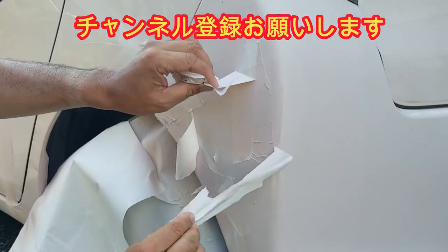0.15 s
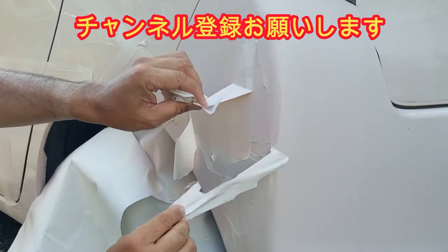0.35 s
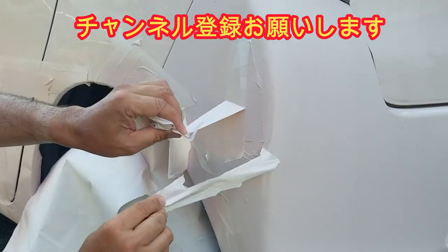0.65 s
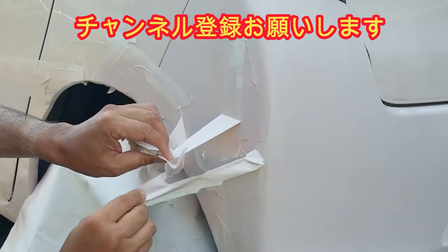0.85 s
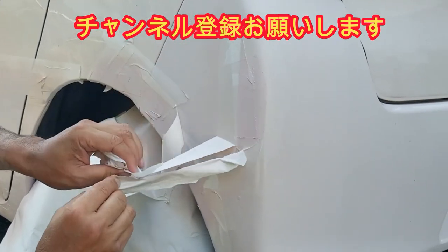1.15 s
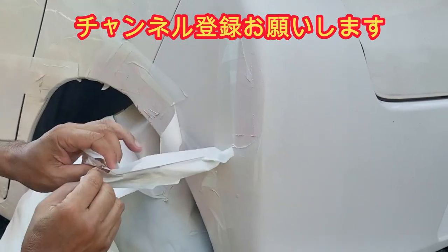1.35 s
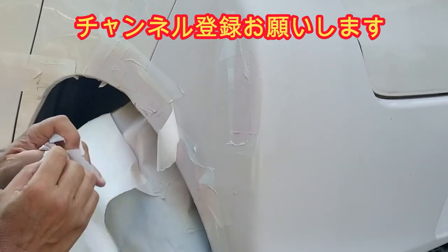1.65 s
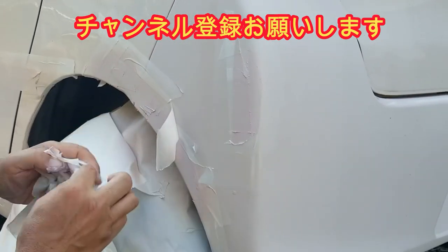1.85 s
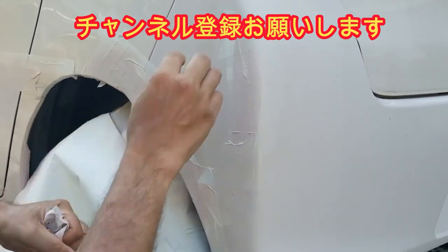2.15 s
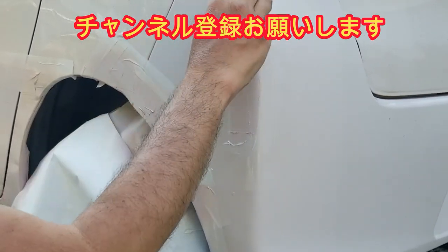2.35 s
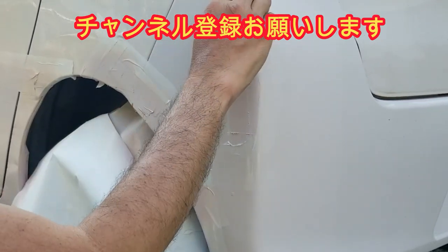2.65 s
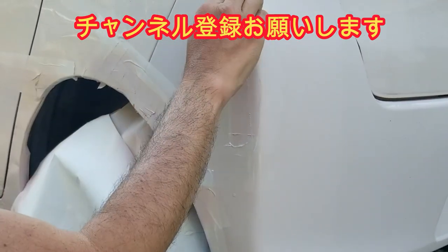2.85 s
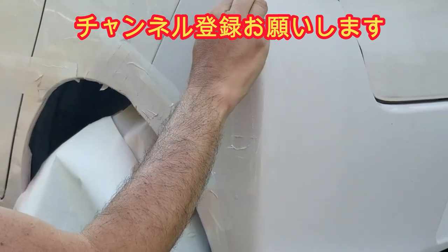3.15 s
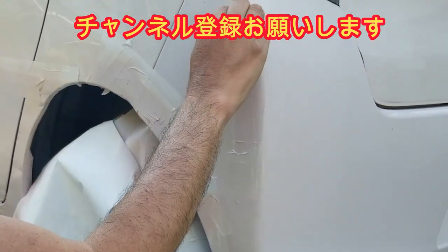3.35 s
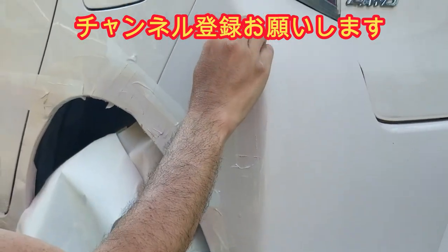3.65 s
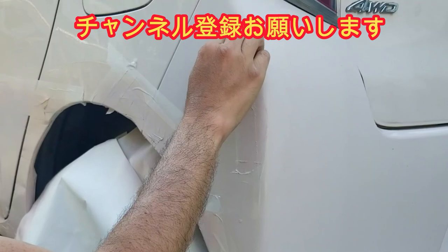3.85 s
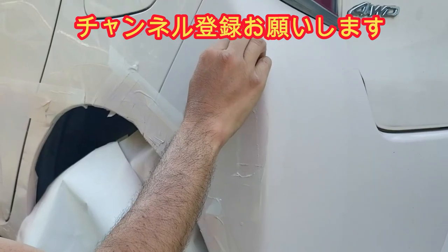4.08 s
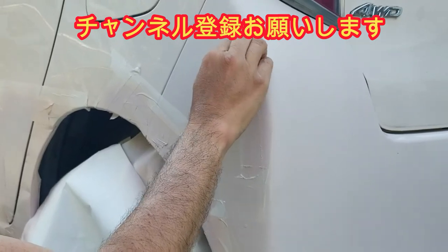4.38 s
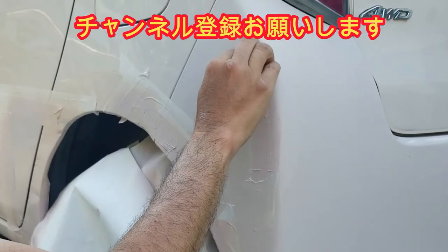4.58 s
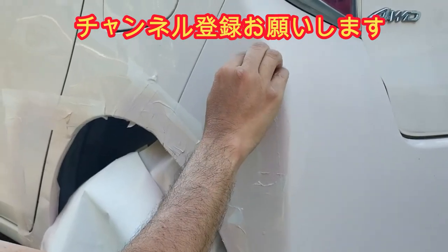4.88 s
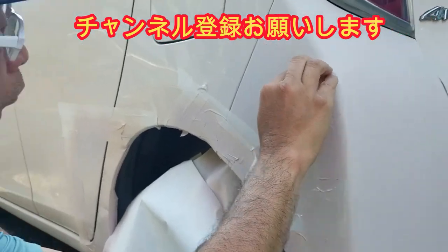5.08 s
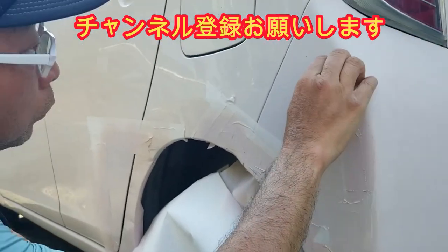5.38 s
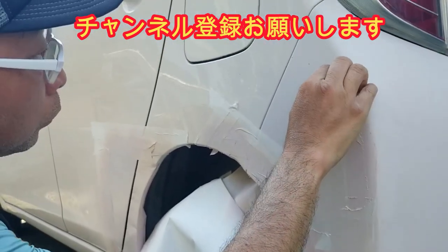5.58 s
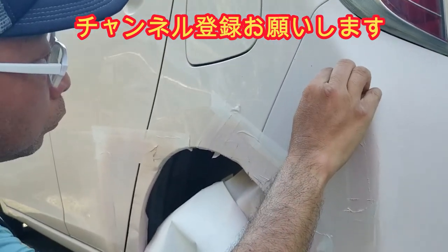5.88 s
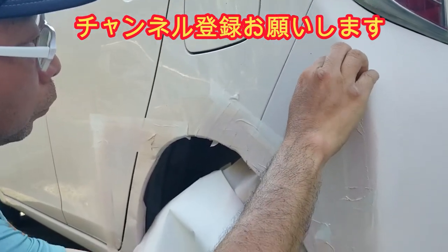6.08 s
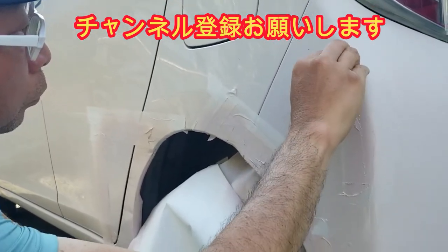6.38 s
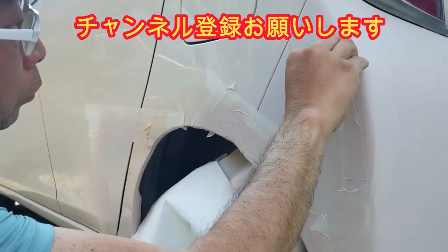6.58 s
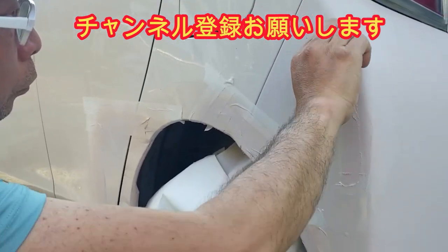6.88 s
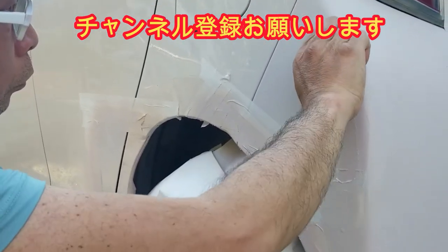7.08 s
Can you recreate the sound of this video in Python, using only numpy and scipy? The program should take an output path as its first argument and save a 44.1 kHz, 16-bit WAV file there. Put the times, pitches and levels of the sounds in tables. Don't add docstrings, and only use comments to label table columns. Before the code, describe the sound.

Close outdoor sound of tape tearing from hollow metal, paper creases snapping in the hands, then sparse nail knocks amid shrill insects and faint traffic.

```python
import sys
import numpy as np
from scipy import signal
from scipy.fft import rfft, irfft
from scipy.io import wavfile

SR = 44100
rng = np.random.default_rng(int(sys.argv[2]) if len(sys.argv) > 2 else 0)


def boost_factor(decibels):
    exponent = np.asarray(decibels, float) / 20
    return 10 ** exponent


def output_pcm(signal):
    pcm = np.clip(np.atleast_2d(signal).T, -1, 1) * 32767
    wavfile.write(sys.argv[1], SR, np.round(pcm).astype(np.int16))


N = 318843


def rms_one(x):
    return x / np.sqrt(np.mean(x ** 2, axis=-1, keepdims=True) + 1e-20)


def peak_one(x):
    return x / abs(x).max()


def filtered(x, order, hz, kind):
    return signal.sosfilt(signal.butter(order, hz, kind, fs=SR, output="sos"), x)


def in_time(rows, off_db=-120):
    s, *columns = np.transpose(rows)
    return [np.interp(np.arange(N) / SR, s, c, off_db, off_db) for c in columns]


def at_hz(points, hz):
    table = np.array(points)
    return np.interp(np.log(hz + 1e-3), np.log(table[:, 0]), table[:, 1])


def colour(x, points, extra_db=0):
    hz = np.arange(N // 2 + 1) * SR / N
    inside = (hz > points[0][0]) & (hz < points[-1][0])
    return irfft(rfft(x) * boost_factor(at_hz(points, hz) + extra_db) * inside, N)


def drift(rate):
    r = np.exp(-80 * np.pi * rate / SR)
    slow = signal.lfilter([1], [1, -2 * r, r * r], rng.standard_normal(N // 40 + 2002))[2000:]
    return np.interp(np.arange(N) / 40, np.arange(len(slow)), rms_one(slow))


def ring(clicks, hz, t60):
    r, w = boost_factor(-60 / (t60 * SR)), 2 * np.pi * hz / SR
    return signal.lfilter([0, np.sin(w)], [1, -2 * r * np.cos(w), r * r], clicks + 1e-18)


def grains(per_s, spread_db):
    sizes = boost_factor(spread_db * np.minimum(rng.exponential(1, N), 5)) * rng.choice([-1, 1], N)
    return sizes * (rng.random(N) < per_s / SR)


def swells(s, db, rise, fall):
    power, reach = np.zeros(N + SR), np.arange(-SR // 4, SR // 2) / SR
    bump = np.exp(-2 * np.where(reach < 0, (reach / rise) ** 2, reach / fall))
    for at, level_db in zip(s, db):
        i = round(at * SR)
        power[i:i + len(reach)] += boost_factor(2 * level_db) * bump
    return np.sqrt(power[SR // 4:SR // 4 + N])


def pan(pan_db):
    return boost_factor(np.multiply.outer([.5, -.5], pan_db * np.ones(N)))


def place(x, pan_db, lag):
    return np.array([np.roll(x, lag), x]) * pan(pan_db)


# (frequency [Hz], left minus right [dB])
SIDE_SPECTRUM = [(40, 1), (80, 0.5), (200, 4.5), (700, 4.5), (1500, 4), (2700, 7.5), (4000, -0.5),
                 (6000, 9.5), (7500, 6.5), (9000, -4), (11000, 4.5), (15000, 4)]


def sides(hz):
    return np.multiply.outer([.5, -.5], at_hz(SIDE_SPECTRUM, hz))


# (frequency [Hz], density [dB per Hz])
STREET_SPECTRUM = [(13, -35), (22, -46), (42, -1), (85, 2), (183, -13), (219, -11), (241, -11), (461, -25),
                   (561, -25.5), (1120, -27.5), (1210, -27.5), (1970, -32.5), (2400, -33), (3120, -18),
                   (5280, -120)]
# (frequency [Hz], likeness [0-1])
LIKENESS = [(60, 0.62), (180, 0.75), (550, 0.2), (1650, 0.017), (4970, 0.02), (15000, 0.01)]
# (time [s], wash level [dB], rumble level [dB])
ROAD = [(0, -1.5, -52.5), (1.5, 2.5, -54.5), (2.6, 1, -55.5), (4.0, 1, -54.5), (4.9, 1, -52),
        (5.8, 2.5, -50), (6.3, 4.5, -53), (7.23, 6.5, -50.5)]
# (time [s], peak level [dB])
SURGES = [(.54, -40.5), (.94, -45.5), (1.07, -47.5), (1.45, -49), (3.07, -46), (3.47, -53), (3.9, -57),
          (4.478, -46.5), (4.95, -38), (5.08, -39.5), (5.36, -51), (5.69, -44.5), (5.88, -42),
          (6.17, -46.5), (6.28, -45), (6.48, -46)]
# (frequency [Hz], width [Hz], level [dB])
DRONES = [
    (98.2, 4.9, -62),
    (217.6, 6.3, -63.5),
    (2700, 54, -73),
]


def street():
    air_db, rumble_db = in_time(ROAD)
    surges = swells(*np.transpose(SURGES), rise=0.0099, fall=0.058)
    rumble = np.hypot(boost_factor(rumble_db), surges)
    hz = np.arange(N // 2 + 1) * SR / N
    mid, side = rng.standard_normal((2, N))
    alike = np.clip(at_hz(LIKENESS, hz) - 0.029 * (hz < 90), 0, 1)
    pair = np.sqrt(1 + alike) * rfft(mid) + np.sqrt(1 - alike) * rfft(side) * [[1], [-1]]
    inside = (hz > STREET_SPECTRUM[0][0]) & (hz < STREET_SPECTRUM[-1][0])
    pair = pair * boost_factor(at_hz(STREET_SPECTRUM, hz) + sides(hz)) * inside
    low, high = np.zeros((2, 2, N))
    for centre in 25 * 2 ** np.arange(0, 7, .5):
        octaves_off = np.log2((hz + 1e-3) / centre)
        window = np.cos(np.pi * np.clip(octaves_off, -.5, .5)) ** 2
        target = low if centre < 150 else high
        target += irfft(pair * window, N) * boost_factor(1.8 * drift(3.9))
    scale = 1 / low.std()
    out = rumble * low * scale + boost_factor(air_db - 54.0) * high * scale
    for tone_hz, width_hz, level_db in DRONES:
        shared = 1.63 * (tone_hz < 1000) * mid
        tone = rms_one(ring(rng.standard_normal((2, N)) + shared, tone_hz, 3.5 / width_hz))
        out += boost_factor(level_db + 2.0 * drift(3.7)) * tone
    return out


# (frequency [Hz], density [dB per Hz])
SONG_SPECTRUM = [(1120, -53), (1900, -35.5), (2740, -18.5), (3080, -25.5), (3530, -24), (3720, -19),
                 (4180, -14), (5230, 0), (6430, -1.5), (7230, -4.5), (9210, -20.5), (9980, -17.5),
                 (14900, -2.5), (15600, -2.5), (16200, -31)]
# (time [s], swell [dB], drift to the left [dB])
CHORUS = [(0.0, 1, -0.5), (0.82, 0.5, -1.5), (1.99, 0.5, 2), (2.3, 0, 0), (3.42, 1, -1), (4.4, 0.5, 0),
          (5.68, 1, -1), (7.23, 1, 0)]


def cicadas():
    far_db, near_db = -41.5, -42.5
    near_follows, near_drifts = -0.76, 0.74
    tymbal_hz, throb_hz = 192.5, 16.6
    swell_db, far_pan = in_time(CHORUS)
    near_pan = near_drifts * far_pan
    hz = np.arange(N // 2 + 1) * SR / N
    upper = 1 / (1 + np.exp(-(hz - 9500) / 300))
    song = rfft(colour(rng.standard_normal((2, N)), SONG_SPECTRUM, sides(hz)))
    far, near = irfft(song * (1 - upper), N), irfft(song * upper, N)
    beat = 2 * np.pi * np.cumsum(tymbal_hz * (1 + 0.0123 * drift(2.73))) / SR
    pump = np.cos(2 * np.pi * np.cumsum(throb_hz * (1 + 0.044 * drift(1.8))) / SR)
    depth = np.clip(1 + .5 * drift(1.0), 0, 2)
    pulses = 0.53 * np.cos(beat) * (1 + 1.0 * pump) + 0.75 * np.cos(2 * beat)
    near = near * boost_factor(depth * (pulses + 0.7 * pump))
    far = far * boost_factor(.5 * drift(36) + 0.12 * drift(210) + 0.17 * pump)
    far = far * pan(far_pan - far_pan.mean())
    near = near * pan(near_pan - near_pan.mean())
    chorus = boost_factor(far_db + swell_db) * far / far.std()
    return chorus + boost_factor(near_db + near_follows * swell_db) * near / near.std()


# (frequency [Hz], level [dB], t60 [s])
PANEL = [(155, 6.5, 0.16), (203.4, 2.5, 0.12), (297, -6, 0.17), (315, 1.5, 0.12), (354, -8, 0.47),
         (382, 0.5, 0.083), (437, -9, 0.14), (473.5, -8, 0.15), (528, -11.5, 0.063), (591, -21, 0.26),
         (665, -10.5, 0.074), (765, -13.5, 0.16), (867, -7.5, 0.18), (1060, -18, 0.085), (1190, 0.5, 0.058),
         (1615, -25, 0.064), (1490, -28, 0.019), (1597, -5.5, 0.044), (1720, -6.5, 0.098), (1870, -6, 0.09),
         (2420, -7, 0.09), (2870, 0, 0.056)]


def panel(force, damping):
    return sum(boost_factor(db) * ring(force * rng.uniform(0.14, 1, N), hz, t60 * damping)
               for hz, db, t60 in PANEL)


# (time [s], level [dB], length [s])
RUBS = [
    (1.596, -57, 0.031),
    (4.62, -65, 0.047),
    (5.048, -61.5, 0.071),
    (5.313, -71.5, 0.074),
    (5.893, -56.5, 0.022),
    (6.026, -60.5, 0.052),
]


def rubs():
    ring_db, damping = -3, 0.59
    t = np.arange(N) / SR
    touch = sum(boost_factor(db) * np.sin(np.pi * np.clip((t - s) / (2 * length), 0, 1) ** 0.6)
                for s, db, length in RUBS)
    force = grains(2500, 2.3)
    friction = signal.lfilter([1], [1, -.9], filtered(force, 2, [330, 1700], "band"))
    modes = sum(boost_factor(db) * ring(force, hz, damping * t60) for hz, db, t60 in PANEL if 800 < hz < 1300)
    return place(touch * (rms_one(friction) + boost_factor(ring_db) * rms_one(modes)), 1.4, 13)


# (time [s], peak level [dB], first pitch [Hz], last pitch [Hz], swell [s])
SPRINGS = [(3.046, -40.5, 386, 300, 0.009), (3.48, -35.5, 470, 280, .01), (3.681, -40, 344, 285, 0.014),
           (3.893, -32, 377, 285, 0.013), (5.896, -37.5, 457, 263, 0.022), (6.04, -43.5, 317, 299, 0.018),
           (7.22, -44, 397, 300, .01), (3.478, -35, 556, 500, 0.004), (5.894, -44, 540, 490, 0.0092),
           (3.065, -44, 340, 288, 0.0082), (5.085, -51, 420, 330, 0.012), (5.33, -55, 432, 337, 0.022)]


def springs():
    sag_s, rough_db = 0.0204, 2.5
    out, size = np.zeros(N + 8192), 8192
    t = np.arange(size) / SR
    wobble = boost_factor(rough_db * drift(45))
    for s, db, first_hz, last_hz, swell in SPRINGS:
        hz = last_hz + (first_hz - last_hz) * np.exp(-t / sag_s)
        envelope = (t / swell * np.exp(1 - t / swell)) ** 2
        i = round(s * SR)
        out[i:i + size] += boost_factor(db) * envelope * np.sin(2 * np.pi * np.cumsum(hz) / SR)
    return place(out[:N] * wobble, 1.5, 5)


# (time [s], level [dB], length [s], squeak [Hz])
DRAGS = [
    (3.397, -54.5, .02, 1620),
    (3.746, -53, 0.025, 2430),
    (3.759, -53, 0.043, 1860),
    (3.822, -41.5, 0.023, 1860),
    (3.839, -50, 0.018, 1900),
]


def drags():
    rasp_db = -3.5
    out, size = np.zeros(N), 4096
    t = np.arange(size) / SR
    for s, db, length, hz in DRAGS:
        force = rng.standard_normal(size) * (rng.random(size) < .3)
        squeak = rms_one(np.diff(ring(force, hz, 0.0073), prepend=0))
        rasp = rms_one(filtered(force, 4, [1500, 4600], "band"))
        envelope = (1 - np.exp(-t / 0.0024)) * np.exp(-(t / (1.0 * length)) ** 2)
        i = round(s * SR)
        out[i:i + size] += boost_factor(db) * envelope * (squeak + boost_factor(rasp_db) * rasp)
    return place(out, 1.4, 3)


# (time [s], peak level [dB], length [s])
FLICKS = [(1.4094, -30, 0.002), (1.7346, -29, .0015), (1.8673, -32, .001), (2.2664, -32, .001),
          (1.758, -25, 0.003), (1.76, -28, 0.003), (1.778, -32, .0015), (1.885, -24, 0.0019),
          (2.004, -31, 0.0017), (2.0237, -14, 0.0008), (2.572, -25, 0.002)]


def flicks():
    envelope, t = np.zeros((2, N)), np.arange(N) / SR
    for s, db, length in FLICKS:
        envelope += boost_factor(db - 8.0) * (t >= s) * np.exp(-np.clip(t - s, 0, 1) / max(length, 3e-4))
    noise = rng.standard_normal(N) + .5 * rng.standard_normal((2, N))
    return filtered(envelope * noise, 2, 8500, "high")


# (time [s], peak level [dB], weight [dB], hardness [dB], scrape length [s])
PICKS = [(2.333, -53.5, -1, 2, 0.027), (2.667, -48, 1.5, -12, 0.024), (2.884, -43.5, -1.5, -17, 0.031),
         (3.043, -34, -5, -11.5, 0.012), (3.066, -38, -6, -8, 0.02), (3.295, -45, -21, -32, 0.075),
         (3.4, -51.5, 7, 0, 0.093), (3.477, -26, -0.5, -1, 0.014), (3.519, -38.5, -6, -12, 0.019),
         (3.675, -35, -8, -14, 0.03), (3.89, -35, 0, -2.5, 0.025), (4.529, -51.5, -9, -19, 0.02),
         (4.634, -54, -1, 3.5, 0.024), (5.084, -45, 0, -4, 0.043), (5.458, -49, -14, -29, 0.011),
         (5.583, -53, -11, -19, 0.012), (5.8935, -42.5, -8, 8, 0.02), (5.916, -34, -16, -11, 0.014),
         (6.04, -43.5, -9, -3, 0.058), (6.091, -56, -11, 8, 0.025), (7.219, -32, -12, -7.5, 0.015)]


def picks():
    nail_rise_s = .003
    knock_db, knock_follows = -10, 0.43
    crack_db, crack_s = -3, 0.0037
    out, size = np.zeros(N + 8192), 8192
    t, hz = np.arange(size) / SR, np.array(PANEL)[:, 0]
    group = np.digitize(hz, [230, 500, 800])
    for s, db, thump_db, hard_db, length in PICKS:
        length = max(length, 1e-3)
        knocks = rng.standard_normal(size) * (rng.random(size) < .08)
        knocks[0] = 0.62
        knocks[1:] *= 1 - np.exp(-t[1:] / nail_rise_s)
        knocks[round(nail_rise_s * SR)] = 1.92
        fade = np.exp(-t / length * (hz[:, None] / 300) ** 0.46)
        rings = []
        for (mode_hz, mode_db, t60), mode_fade in zip(PANEL, fade):
            force = knocks * mode_fade * rng.uniform(0.063, 1, size)
            rings.append(boost_factor(mode_db) * peak_one(ring(force, mode_hz, 0.73 * t60)))
        rings = np.array(rings)
        i = round(s * SR)
        group_db = (thump_db, 0, knock_db + knock_follows * hard_db, hard_db - 0.5)
        for k, part_db in enumerate(group_db):
            out[i:i + size] += boost_factor(db + part_db) * peak_one(rings[group == k].sum(axis=0))
        scrape = filtered(rng.standard_normal(size), 2, [700, 3500], "band") * np.exp(-t / length / 1.8)
        crack = filtered(rng.standard_normal(size) * np.exp(-t / crack_s), 2, [1800, 4200], "band")
        out[i:i + size] += boost_factor(db + hard_db - 5.0) * peak_one(scrape)
        out[i:i + size] += boost_factor(db + hard_db + crack_db) * peak_one(crack)
    return place(filtered(out[:N], 2, 90, "high"), 2.9, 7)


# (time [s], peak level [dB], ring [Hz], left minus right [dB], length [ms])
CREASES = [(1.5883, -44, 3440, 3, 3.1), (1.602, -46, 1300, 1.1, 3.7), (1.6057, -35, 2450, 5, 4),
           (1.607, -37, 4150, -1, 7.4), (1.613, -43, 1180, 6, 3.9), (1.622, -42, 2300, 2, 5.7),
           (1.6284, -33, 2420, 0.1, 2), (1.638, -38, 1500, 0, 5.1), (1.647, -47, 3300, 1, 3.1),
           (1.652, -38, 1760, 1, 7.6), (1.657, -32, 2300, 1, 2.6), (1.667, -38.5, 1750, .1, 8),
           (1.695, -37.5, 4160, 5, 4.1), (1.702, -37, 3390, -3, 4.1), (1.7365, -35, 3420, -1.1, 5),
           (1.7554, -36, 2760, -1, 5.1), (1.760, -34, 4100, -4, 4.7), (1.765, -33, 2470, 3, 7.2),
           (1.772, -33, 3640, -3, 4.8), (1.778, -37, 3200, -5, 1.5), (1.819, -49, 2430, -7, 3.1),
           (1.827, -46, 2470, -3, 3.8), (1.8506, -35, 4160, -6, 4.1), (1.8829, -25, 3050, 1, 5.1),
           (1.8845, -23, 2400, -5, 1.6), (1.887, -25.5, 2450, 7, 1.9), (1.9044, -48, 2770, -3, 5.1),
           (1.9332, -30.5, 3290, 0, 1.5), (1.936, -32, 2500, 5, 4.5), (1.9597, -33, 3110, -6, 2.9),
           (1.9654, -33, 2500, -1, 2.9), (1.9685, -30, 4100, 8, 3.1), (2.0078, -33, 4400, -6, .6),
           (2.0097, -17.5, 3350, -5, 0.73), (2.019, -44, 3500, -2.1, 4.1), (2.0245, -23, 3000, -4, 1.2),
           (2.0265, -22, 3500, -2, 1.6), (2.0285, -24.5, 3600, -1, 2.9), (2.0315, -26.5, 2400, 6, 2.8),
           (2.0414, -40, 2900, -3, 6.1)]
# (time [s], peak level [dB], ring [Hz])
TICKS = [(0.449, -36, 4200), (1.054, -44, 4120), (1.089, -39, 1720), (1.293, -44, 1760),
         (1.3264, -41, 1870), (1.402, -47, 1950), (1.4594, -40, 2460), (1.491, -34, 2500),
         (1.547, -40, 4150), (2.101, -37, 2820), (2.147, -30.5, 2570), (2.171, -37, 1930),
         (2.207, -34.5, 4030), (2.2178, -36, 1970), (2.2408, -45, 2860), (2.287, -31.5, 2600),
         (2.293, -38, 2650), (2.315, -32.5, 2310), (2.354, -39, 2360), (2.383, -38, 2630),
         (2.387, -42, 4000), (2.394, -35, 3900), (2.411, -46, 1700), (2.433, -42, 2200),
         (2.4026, -32, 3460), (2.421, -40, 2420), (2.535, -44, 2700), (2.586, -44, 3220),
         (2.7283, -45, 3840), (2.087, -57, 2790), (2.263, -48, 2410), (2.56, -50, 3000), (1.397, -39, 7900),
         (1.407, -38, 7500), (1.492, -29, 6450), (1.758, -34, 7200), (1.8865, -30, 6250),
         (2.028, -32, 6500), (1.913, -50, 2400), (1.948, -46, 2600), (2.048, -48, 3000), (2.162, -42, 2300),
         (2.332, -45, 2500), (2.366, -46, 2300)]
# (frequency [Hz], density [dB per Hz])
PAPER_SPECTRUM = [(290, -52), (500, -9), (1250, -6), (1400, -3.5), (2100, 4.5), (2360, 5.5), (5970, 4.5),
                  (9090, -10), (13100, -1), (16000, -70)]
# (start time [s], stop time [s], first level [dB], last level [dB])
HANDLING = (1.585, 3, -48.5, -62)


def loose_creases():
    rows = []
    for s, db, hz in TICKS:
        pan_db = -2 + 0.5 * rng.standard_normal()
        rows.append((s, db, hz, pan_db, 1000 * 0.0038 * boost_factor(0.22 * (db + 48.0))))
    return rows


def crease(db, hz, ms, loose):
    size = 2048
    t = np.arange(size) / SR
    bursts = rng.standard_normal((2, size)) * (rng.random(size) < .4)
    bursts *= np.exp(-(t / max(ms / 1000, 3e-4)) ** 2)
    bursts[:, 0] = min(3.4, 5.1 / ms)
    burst = bursts[0] + 0.63 * bursts[1] * [[1], [-1]]
    pitch = peak_one(np.diff(ring(burst, hz, 9 / hz), prepend=0))
    broad = peak_one(filtered(burst, 2, [2100, 5500], "band"))
    wad = boost_factor(-21 if loose else -16) * peak_one(ring(burst, 990, 0.0061))
    snap = pitch + 0.57 * broad + wad
    if loose:
        snap = filtered(snap, 2, 19000, "low")
    edge_db = -11 - 1 * (db + 37) + 5 * loose
    edge = peak_one(filtered(burst, 2, 8000, "high"))
    return boost_factor(db + 3.0) * (0.76 * snap + boost_factor(edge_db) * edge)


def rustle(snaps):
    start, stop, first_db, last_db = HANDLING
    s, db, _, _, ms = np.transpose([snap for snap in snaps if snap[0] > start])
    wake_db = -48 + 0.8 * (db + 36.5) + 1 * (ms - 3.5)
    wake = swells(s, wake_db, rise=0.0012, fall=0.013)
    murmur = boost_factor(in_time([(start, first_db), (stop, last_db)])[0])
    dense = 2500 * boost_factor(6 * drift(60))
    paper = grains(dense, 1.5) + .6 * grains(dense, 1.5) * [[1], [-1]]
    paper = colour(paper, PAPER_SPECTRUM)
    return np.hypot(wake, murmur) * paper / paper.std()


def crumple():
    out = np.zeros((2, N))
    snaps = CREASES + loose_creases()
    for k, (s, db, hz, pan_db, ms) in enumerate(snaps):
        snap = crease(db, hz, ms, loose=k >= len(CREASES))
        i = round(s * SR)
        out[:, i:i + snap.shape[1]] += snap * boost_factor([[pan_db / 2], [-pan_db / 2]])
    return out + rustle(snaps)


# (time [s], panel drumming [dB], peel angle as crackle over drumming [dB], tautness [dB])
PEEL = [
    [(0.0, -52, -5, 1), (0.07, -52.5, -6.5, 4.5), (0.144, -55, -8, 4), (0.2, -55.5, -1, 6.5),
     (0.27, -53, -6.5, 5), (0.33, -54, -8, 5), (0.4, -51, -4.5, 3.5), (0.456, -50.5, -4, 0.5),
     (0.566, -62.5, -0.5, 6)],
    [(0.628, -47.5, -9.5, 1), (0.7, -51, -4.5, 1.5), (0.77, -52, -2.5, 7), (0.84, -53.5, -3.5, 8),
     (0.91, -47.5, -6, 3), (0.98, -51.5, -4.5, 5.5), (1.068, -46.5, -3, 2.5), (1.13, -51.5, -1.5, 1)],
    [(1.204, -60, -2, -2), (1.25, -50.5, -3.5, -1), (1.295, -48, 0.5, -2), (1.376, -53.5, 2.5, 1),
     (1.42, -46.5, -3, -3), (1.464, -47.5, 1.5, -4), (1.496, -48.5, 4.5, 1), (1.526, -54.5, -1, 1),
     (1.58, -72, -12, .1)],
]
# (frequency [Hz], density [dB per Hz])
TAPE_SPECTRUM = [(500, 14), (900, 0), (1500, 5), (1780, 11.5), (1990, 7), (2130, -5), (2280, 9), (2480, 8),
                 (2800, 6), (3050, -3), (3250, 10.5), (3650, 2), (4100, 9.5), (5000, 6), (9000, 0.5),
                 (16000, 2.5)]
# (frequency [Hz], level [dB], t60 [s])
STRIP = [(554, -3, 0.038), (675, 6.5, 0.031), (755, 3.5, 0.052), (894, 16.5, 0.0075)]


def peel():
    drum_db, angle_db, taut_db = in_time(sum(PEEL, []))
    strip_db = -54.5 + 1 * (drum_db + 53) + 0.7 * angle_db + taut_db
    crackle_db = drum_db + angle_db
    slips = grains(2500 * boost_factor(1.7 * drift(25)), 1.6)
    drum = rms_one(panel(signal.lfilter([.1], [1, -.92], slips), damping=0.65))
    drum = filtered(drum, 2, 240, "high")
    strip = rms_one(sum(boost_factor(db) * ring(slips * rng.uniform(0.28, 1, N), hz, t60)
                        for hz, db, t60 in STRIP))
    crackle = rms_one(colour(grains(2000 * boost_factor(3.7 * drift(40)), 1.4), TAPE_SPECTRUM))
    out = place(boost_factor(drum_db + 6.5) * drum, 1.7, 8)
    out += place(boost_factor(strip_db - 4.0) * strip, 3.5, 8)
    return out + place(boost_factor(crackle_db + 3.5) * crackle, -0.55, 3)


def scene():
    background = street() + cicadas()
    return background + rubs() + springs() + drags() + flicks() + picks() + crumple() + peel()


def low_pass(x):
    return signal.sosfilt(signal.butter(12, 15900, fs=SR, output="sos"), x)


def record(dry):
    dry = filtered(dry, 2, 32, "high")
    mix = signal.sosfilt(signal.cheby2(20, 80, 16200, fs=SR, output="sos"), dry)
    return low_pass(mix)


dry = scene()
out = record(dry)
output_pcm(out)
```